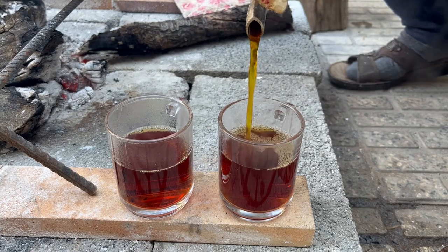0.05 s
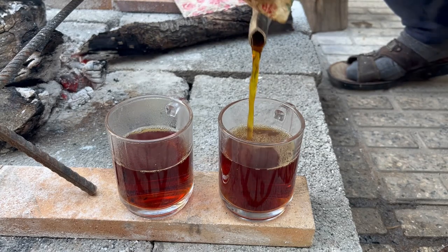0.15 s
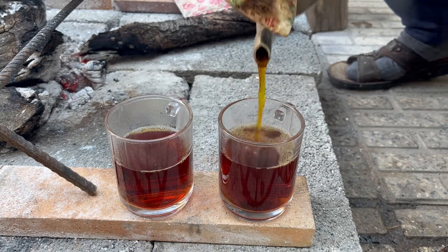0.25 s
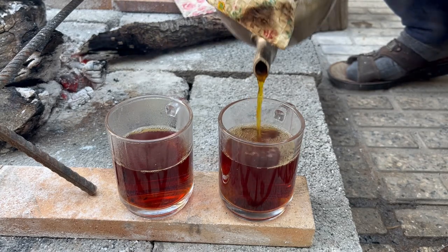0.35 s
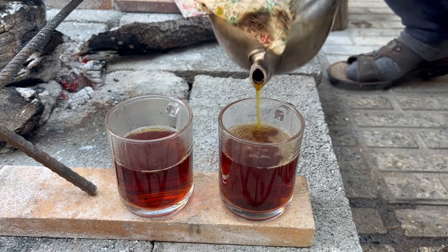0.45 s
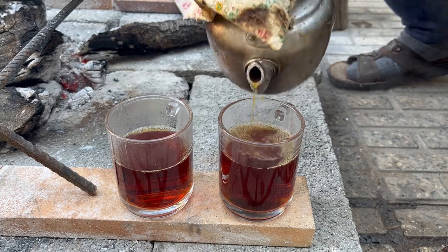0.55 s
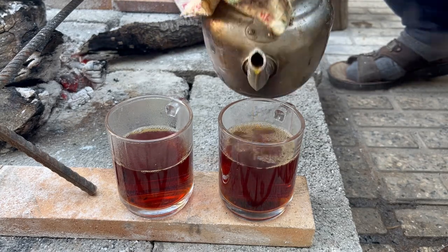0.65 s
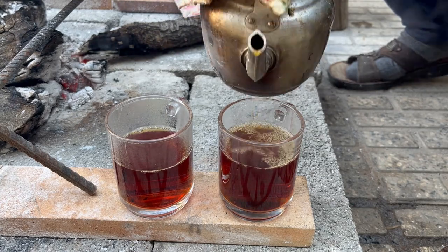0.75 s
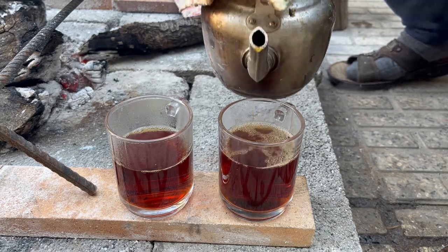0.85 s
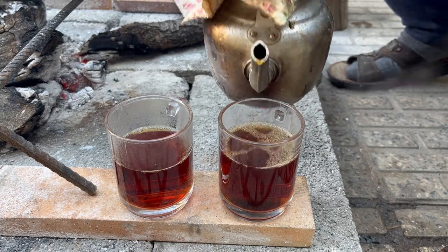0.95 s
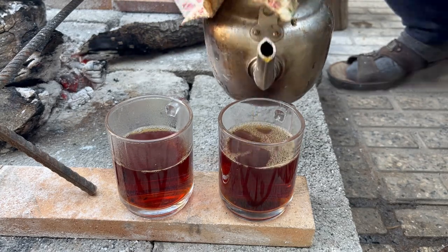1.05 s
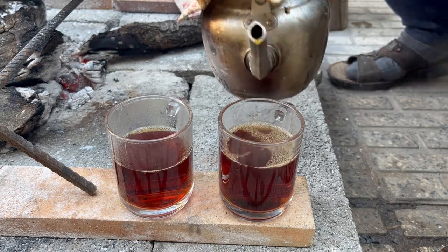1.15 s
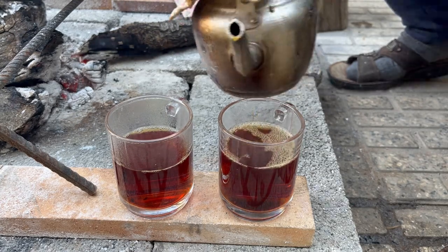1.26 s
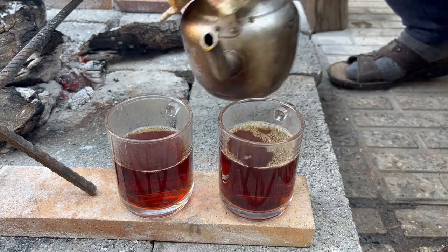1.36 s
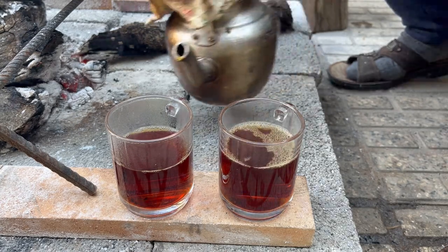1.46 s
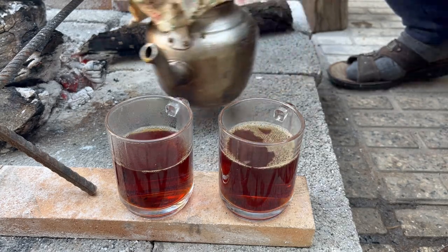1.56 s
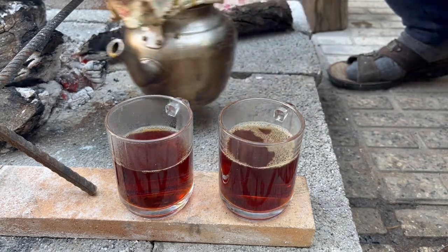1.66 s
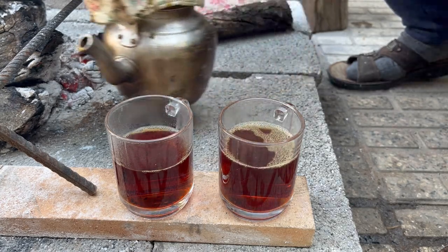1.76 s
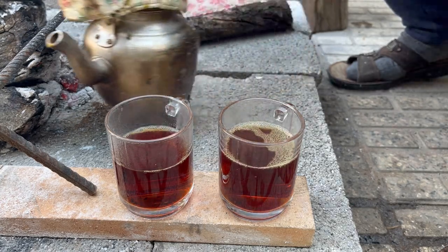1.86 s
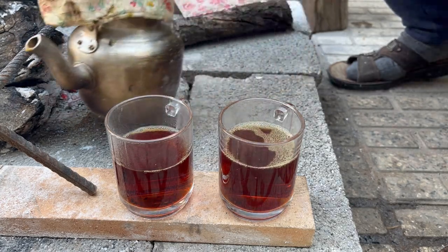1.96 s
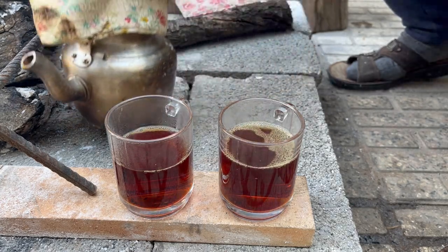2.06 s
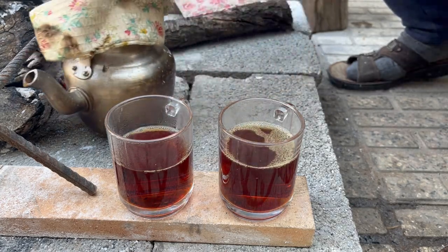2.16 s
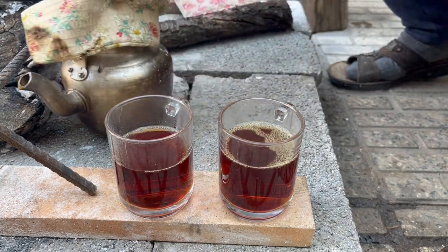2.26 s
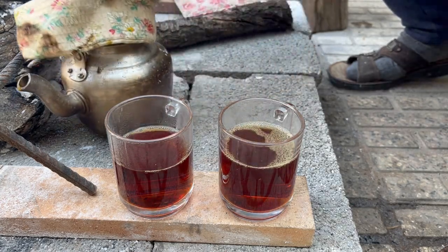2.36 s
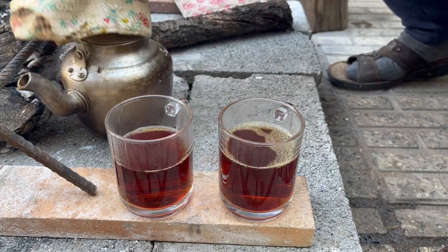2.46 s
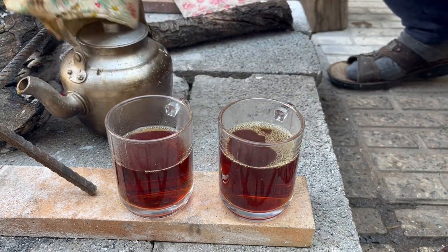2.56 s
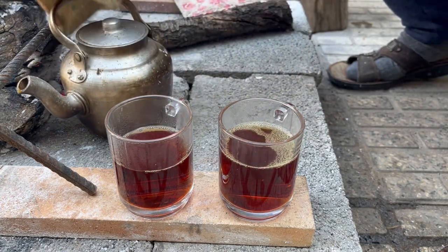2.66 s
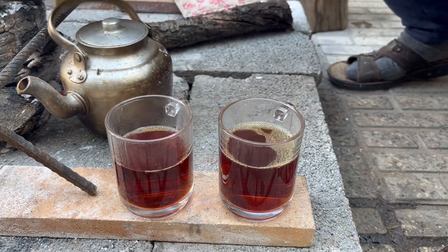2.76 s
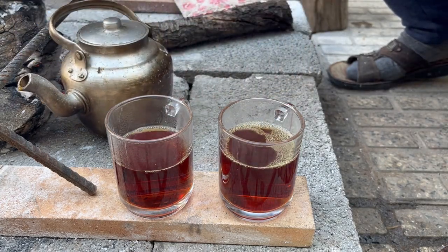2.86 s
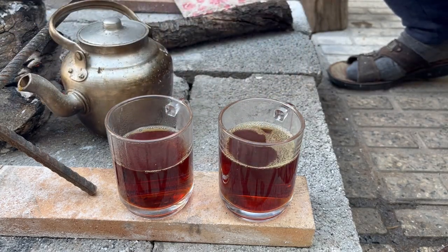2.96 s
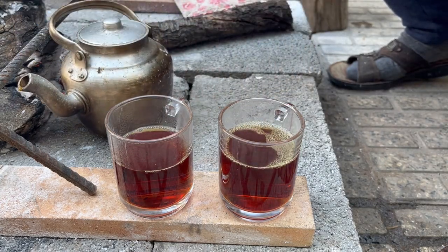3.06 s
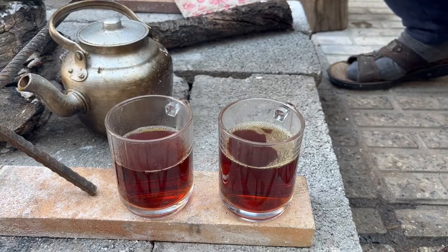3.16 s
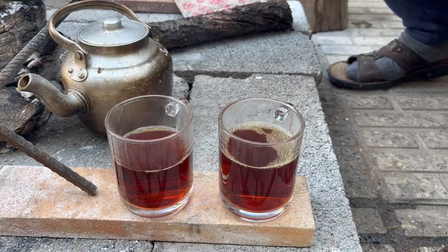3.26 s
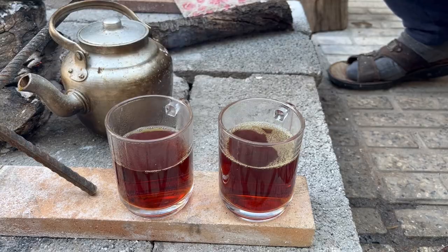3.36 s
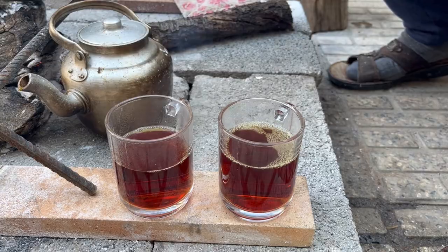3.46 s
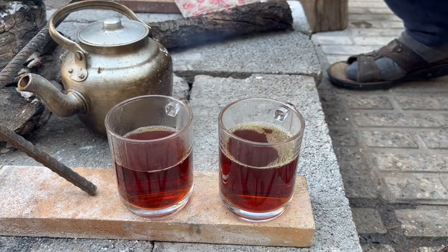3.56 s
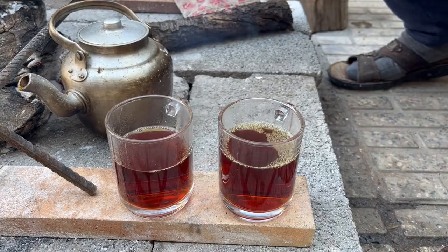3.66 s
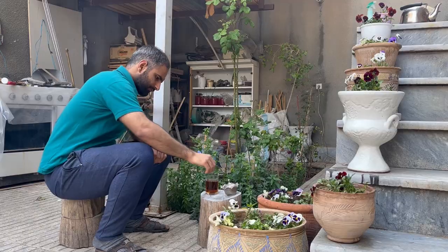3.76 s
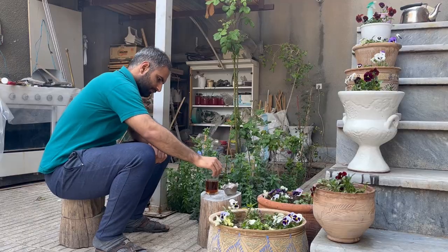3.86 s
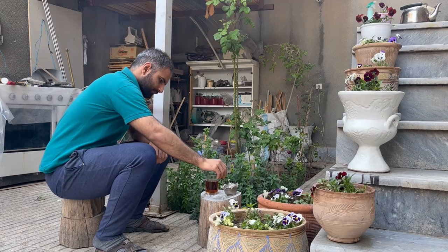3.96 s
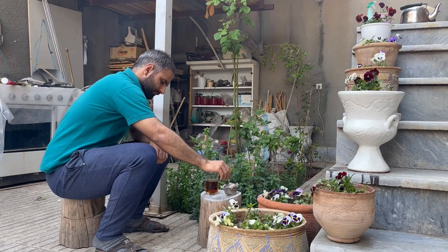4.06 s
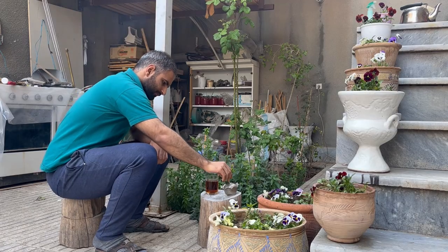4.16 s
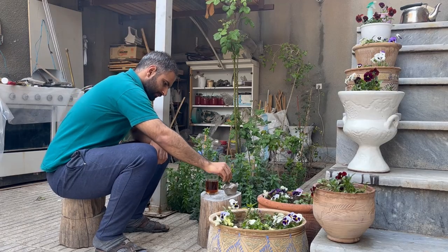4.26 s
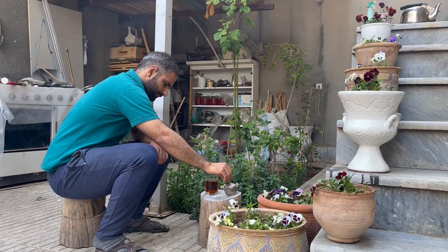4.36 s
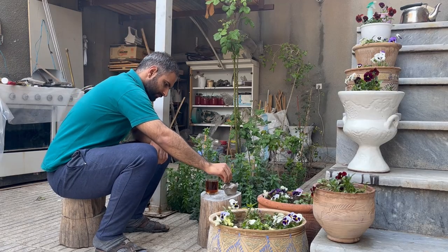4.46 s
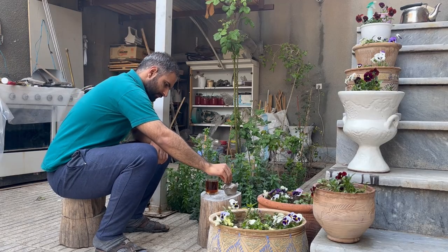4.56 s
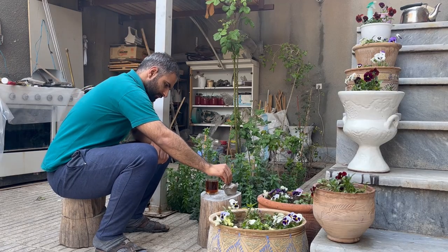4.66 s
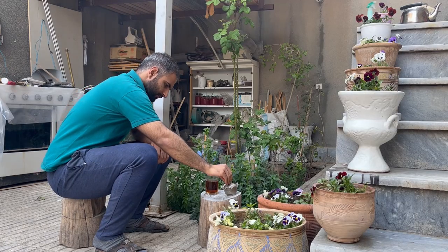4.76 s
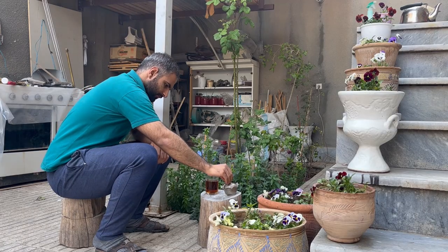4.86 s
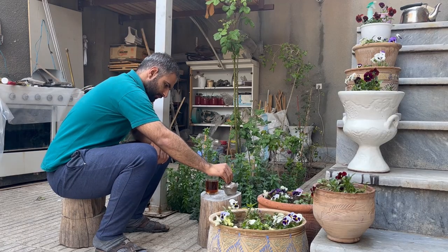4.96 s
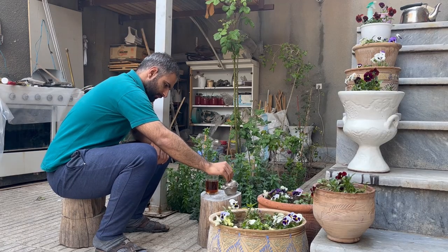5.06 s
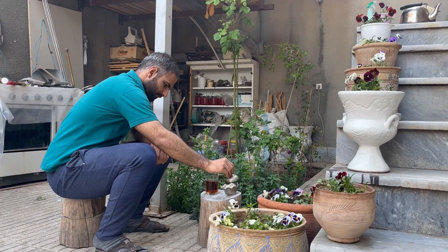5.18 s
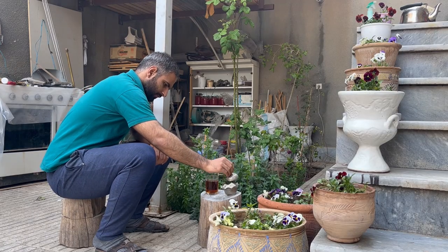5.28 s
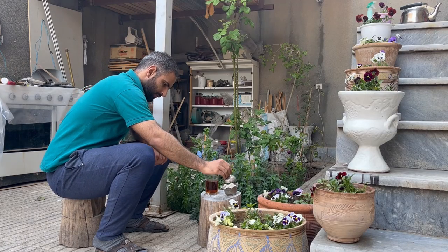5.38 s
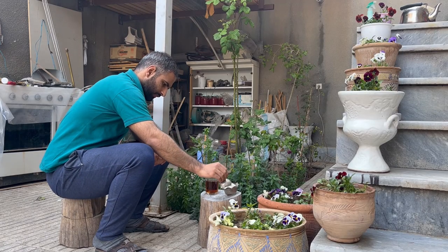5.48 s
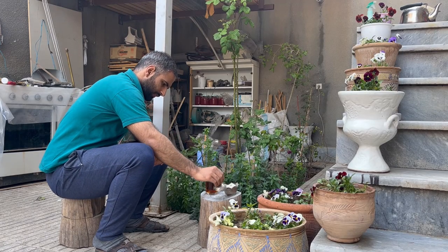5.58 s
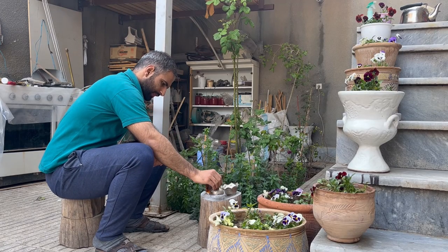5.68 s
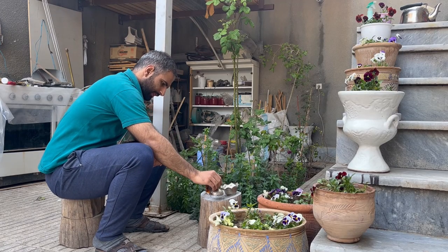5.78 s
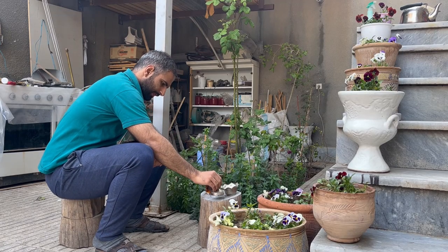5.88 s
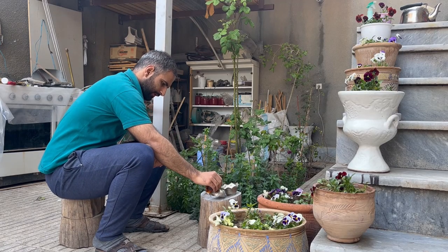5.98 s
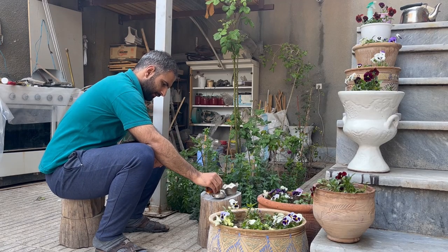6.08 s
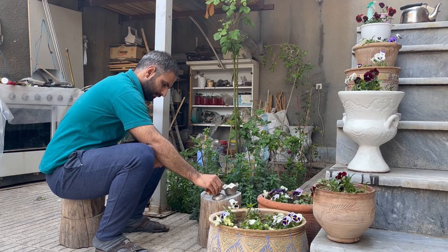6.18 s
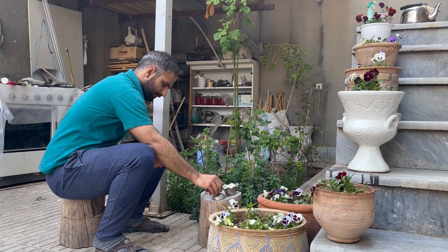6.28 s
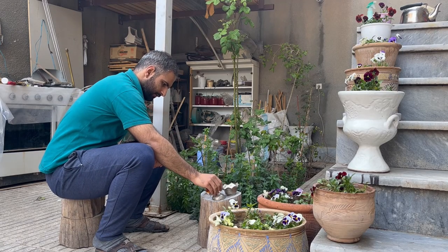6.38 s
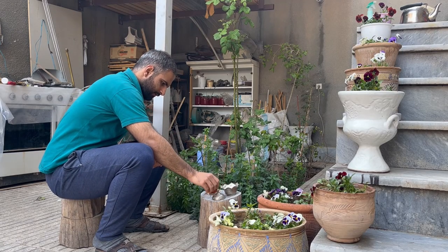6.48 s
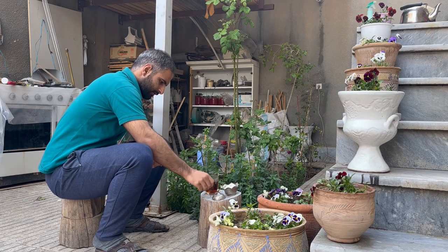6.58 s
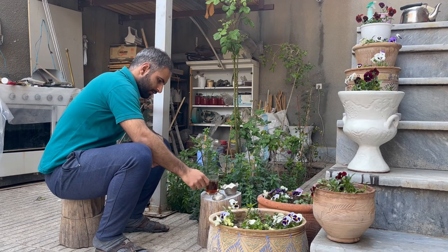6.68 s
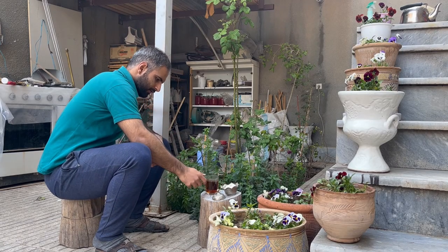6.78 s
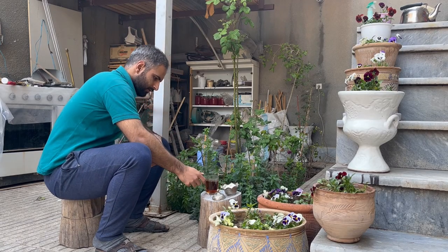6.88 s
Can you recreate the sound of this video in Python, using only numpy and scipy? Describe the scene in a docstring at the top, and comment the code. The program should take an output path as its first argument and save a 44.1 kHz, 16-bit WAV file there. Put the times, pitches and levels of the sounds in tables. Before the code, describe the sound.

Sparrows chirp in a yard as tea trickles briefly and a metal kettle is set down with a clatter, leaving quiet birdsong.

```python
"""A walled yard: the last of the tea runs into a glass, trapping bubbles that ring. Embers tick, and a metal
kettle slides, clatters down on stone and drops its handle. Sparrows and another bird chirp in quick gliding
tones that echo off the walls, over the rumble of distant traffic. Then the scene changes to a second, quieter
spot: the rumble and the embers are gone, and only the birds remain in a soft hush, with far whistles and two
rasping calls."""
import sys
import numpy as np
from scipy import signal
from scipy.fft import rfft, irfft
from scipy.io import wavfile

SR = 44100
rng = np.random.default_rng(int(sys.argv[2]) if len(sys.argv) > 2 else 0)


def materialize(psi):
    """Save the field psi as 16-bit PCM at rate SR to the path in sys.argv[1].

    A 1-D psi becomes a single channel; in a 2-D psi each row is a channel.
    """
    bounded = np.clip(np.atleast_2d(psi).T, -1, 1)
    quanta = np.round(bounded * 32767).astype(np.int16)
    wavfile.write(sys.argv[1], SR, quanta)


N = 305592


def amp(db):
    """Turn decibels into a gain."""
    return 10 ** (np.asarray(db) / 20)


def rms_one(x):
    """Scale a signal so that its average strength (rms) is 1."""
    return x / np.sqrt(np.mean(x ** 2) + 1e-20)


def at_hz(points, hz):
    """Read between rows of (Hz, value), spacing the octaves evenly."""
    row_hz, values = np.transpose(points)
    return np.interp(np.log(hz), np.log(row_hz), values)


def drift(rate_hz):
    """A smooth random wander, about 1 in size; a higher rate wanders faster."""
    step = 40
    pole = np.exp(-2 * np.pi * rate_hz * step / SR)
    slow = signal.lfilter([1], [1, -2 * pole, pole * pole], rng.standard_normal(N // step + 2002))[2000:]
    return np.interp(np.arange(N) / step, np.arange(len(slow)), rms_one(slow))


def ring(clicks, hz, ring_s):
    """Each click starts a tone that fades by 60 dB in ring_s seconds."""
    decay, angle = amp(-60 / (ring_s * SR)), 2 * np.pi * hz / SR
    return signal.lfilter([0, np.sin(angle)], [1, -2 * decay * np.cos(angle), decay ** 2], clicks + 1e-18)


def band(x, low_hz, high_hz):
    """Keep the sound between two frequencies."""
    return signal.sosfilt(signal.butter(2, [low_hz, high_hz], "band", fs=SR, output="sos"), x + 1e-18)


def low_noise(top_hz):
    """Noise that fades out above a frequency."""
    return signal.lfilter(*signal.butter(2, top_hz, fs=SR), rng.standard_normal(N))


def stereo_noise(spectrum):
    """Noise shaped by rows of (Hz, dB), most alike on both sides in the bass."""
    # How alike left and right are. Each row: frequency in Hz, likeness (1 means the same).
    likeness = [(60, 0.95), (180, 0.89), (550, 0.38), (1650, 0.62), (4970, 0.51), (15000, 0.66)]
    hz = np.fft.rfftfreq(N, 1 / SR) + 1
    mid, side = rfft(rng.standard_normal((2, N))) * amp(at_hz(spectrum, hz))
    alike = at_hz(likeness, hz)
    return rms_one(irfft(np.sqrt(1 + alike) * mid + np.sqrt(1 - alike) * side * [[1], [-1]], N))


def echoes(x, fade_s, build_s):
    """A wash of yard echoes, different on each side, that builds up and fades by 60 dB."""
    t = np.arange(int(fade_s * SR)) / SR
    tail = rng.standard_normal((2, len(t))) * amp(-60 * t / fade_s) * np.clip(t / build_s, 0, 1)
    return signal.fftconvolve(x[None], tail / np.sqrt(np.sum(tail ** 2) / 2), axes=1)[:, :N]


def pan(x, left_db):
    """Make the left side louder than the right by left_db."""
    return x * amp([[left_db / 2], [-left_db / 2]])


def swells(rows, rise_db_per_s, fall_db_per_s):
    """The level in dB over time of sounds that rise, hold and fall."""
    t = np.arange(N) / SR
    return np.max([db - rise_db_per_s * np.maximum(s - t, 0) - fall_db_per_s * np.maximum(t - s - hold, 0)
                   for s, hold, db, *_ in rows], axis=0)


def sing(notes, hoarse, grit_db, skew):
    """Tones glide through three pitches, roughened by noise; a skew below 1 makes them peak early."""
    tones, loudness = np.zeros((2, N))
    waver = 1 + 0.013 * drift(150)
    for s, length, first, middle, last, db in notes:
        u = np.linspace(0, 1, int(length * SR))   # progress through the note
        here = slice(int(s * SR), int(s * SR) + len(u))
        hz = first * (1 - u) * (1 - 2 * u) + 4 * middle * u * (1 - u) + last * u * (2 * u - 1)
        phase = 2 * np.pi * np.cumsum(hz * waver[here]) / SR
        shape = np.sqrt(np.sin(np.pi * u ** skew).clip(0)) * amp(db)
        tones[here] += shape * (np.sin(phase) + amp(-24.5) * np.sin(2 * phase))
        loudness[here] += shape
    smear = rms_one(low_noise(380))
    grit = rms_one(band(rng.standard_normal(N), 5500, 9000))
    return tones * (1 + hoarse * smear) + amp(grit_db) * loudness * grit


def near_air():
    """The deep, gently wavering background noise at the first spot."""
    # Its tone colour. Each row: frequency in Hz, relative level in dB.
    spectrum = [(15, -31), (25, -9), (64, -7.5), (129, -2), (227, -22.5), (297, -18.5), (582, -29.5),
                (970, -32.5), (1530, -44), (2300, -49), (3340, -45), (6050, -49), (8580, -61.5),
                (12800, -50), (15500, -69.5)]
    return amp(-53 + 0.27 * drift(2.54)) * stereo_noise(spectrum)


def traffic(lump_db, octave_db):
    """Distant traffic: a low drone with two overtones, and a lumpy rumble that partly follows its level."""
    # A low traffic drone near 61 Hz that wavers at random and swells once.
    # Each row: time in seconds, level in dB, frequency in Hz.
    drone_path = [(0.0, -57, 59.5), (0.27, -52.5, 57.2), (0.4, -57.5, 62.36), (0.73, -53.5, 58.7),
                  (0.79, -61.5, 65.6), (0.86, -51.5, 62.9), (1.33, -54.5, 62.6), (1.51, -54, 57.06),
                  (1.63, -58.5, 60.86), (2.28, -42.5, 61), (2.53, -53.5, 61.3), (2.8, -59.5, 55.2),
                  (2.93, -49.5, 62.2), (3.13, -60.5, 63.5), (3.71, -48.5, 64.0), (3.75, -52, 63.9)]
    times, levels, frequencies = np.transpose(drone_path)
    t = np.arange(N) / SR
    db, hz = np.interp(t, times, levels), np.interp(t, times, frequencies)
    phase = 2 * np.pi * np.cumsum(hz * (1 + 0.028 * drift(3.84))) / SR
    wave = np.sin(phase) + amp(octave_db) * np.sin(2 * phase) + amp(-24.5) * np.sin(5 * phase)
    drone = np.sqrt(2) * amp(db + 1.8 * drift(2.5)) * wave
    rumble_db = -61 + .4 * (db - levels.mean()) + lump_db * drift(5.4)
    return drone + amp(rumble_db) * rms_one(band(rng.standard_normal(N), 40, 164))


def tea(cycles, rise, fizz_db):
    """Trapped bubbles ring briefly, rising in pitch; faint ones fizz at random while the stream runs."""
    # The louder bubbles and last drips. Each row: start in seconds, level in dB, pitch in Hz.
    bubbles = [(0.0122, -55, 2050), (0.042, -60, 2020), (0.0635, -50, 1980), (0.1061, -50, 1930),
               (0.1106, -42.5, 1844), (0.1227, -51, 1820), (0.1406, -52, 2010), (0.2385, -51.5, 1880),
               (0.2451, -47, 1860), (0.301, -55, 1970), (0.3232, -57, 1940), (0.5416, -61.5, 1950),
               (0.5555, -56, 1900)]
    out = np.zeros(N)
    for s, db, hz in bubbles:
        t = np.arange(int(2 * cycles / hz * SR)) / SR
        age = t * hz / cycles   # 1 when the bubble has faded by 60 dB
        phase = 2 * np.pi * np.cumsum(hz * (1 + rise * (age - .3))) / SR
        out[int(s * SR):int(s * SR) + len(t)] += amp(db - 60 * age) * np.sin(phase)
    stream = np.interp(np.arange(N) / SR, [0, .36, .5], [1, .7, 0])
    births = (rng.random(N) < 250 / SR) * amp(2.6 * rng.exponential(1, N) + fizz_db) * stream
    fizz_hz, choice = np.geomspace(1600, 2400, 6), rng.integers(0, 6, N)
    return out + sum(ring(births * (choice == k), hz, 14 / hz) for k, hz in enumerate(fizz_hz))


def chipping_bird(fall_hz_per_s):
    """A bird's short, hoarse chips drop in pitch, faster towards the end."""
    # The chips. Each row: start in seconds, length in seconds, first pitch in Hz, level in dB.
    chips = [(0.012, 0.023, 6520, -73.5), (0.562, 0.017, 7270, -68.5), (0.638, 0.028, 6670, -67.5),
             (0.772, 0.02, 5500, -68), (0.926, 0.016, 7180, -65.5), (1.073, 0.021, 6330, -68.5),
             (1.278, 0.023, 7000, -66.5), (1.363, 0.028, 6704, -71.5), (1.53, .01, 5320, -69),
             (1.706, 0.019, 7220, -67), (1.844, 0.023, 6040, -66.5)]
    notes = [(s, length, hz, hz - .4 * fall_hz_per_s * length, hz - fall_hz_per_s * length, db)
             for s, length, hz, db in chips]
    return sing(notes, hoarse=1.0, grit_db=-46, skew=0.45)


def embers(ticks_per_s, small_db):
    """Cracking charcoal makes tiny bright ticks, with fainter ones at random in between."""
    # The louder cracks. Each row: time in seconds, level in dB, dB added for the lower part.
    cracks = [(0.11, -65, -14), (0.406, -64, -1), (0.507, -58, -46), (0.554, -61, -11), (0.59, -60, -9.5),
              (0.943, -65, -12), (1.3706, -66, 3), (1.6093, -62, -33), (1.6158, -63, -11),
              (1.659, -63, -16), (3.1706, -69, -19), (3.192, -62, -5), (3.217, -61, -15), (3.2572, -64, -6),
              (3.4433, -69, -2)]
    high, low = np.zeros((2, N))
    for s, db, lower_db in cracks:
        high[int(s * SR)], low[int(s * SR)] = amp([db, db + lower_db])
    high += (rng.random(N) < ticks_per_s / SR) * amp(small_db + 3 * np.minimum(rng.exponential(1, N), 3))
    ticks = 7 * band(high, 11000, 17000) + 14 * band(low, 4800, 7000)
    return ticks + amp(1.5) * echoes(ticks, .06, 0.0011)


def sparrows():
    """Sparrows build their chirps from four shapes of gliding whistle."""
    # Thin notes that sag. Each row: start in seconds, length in seconds, first pitch in Hz, level in dB.
    thin_notes = [(0.151, 0.091, 6910, -69), (0.25, 0.078, 6460, -68.5), (.73, 0.039, 5800, -74),
                  (0.878, 0.011, 5600, -74), (1.004, 0.026, 5600, -72), (1.207, .05, 5830, -71),
                  (1.458, 0.011, 4960, -68.5), (1.785, .02, 5500, -73), (3.837, 0.06, 6740, -73),
                  (5.497, .04, 6300, -75.5)]
    # A flick up, then a held note. Each row: start in seconds, level in dB, hold in seconds.
    hooks = [(0.198, -61.5, 0.055), (2.84, -64, 0.042), (3.865, -63.5, .057), (4.087, -79, 0.08)]
    # Up, down, up, down. Each row: time of the first top, rise time, drop time and wait for the second
    # top, all in seconds, then the two top pitches in Hz and their two levels in dB.
    zigzags = [(0.297, 0.025, 0.035, 0.058, 4985, 4350, -56, -64.5),
               (1.252, .015, 0.049, .075, 4840, 4000, -61.5, -66.5),
               (2.962, .04, 0.036, 0.038, 5199, 4470, -58.5, -60),
               (3.961, 0.028, 0.03, .061, 4900, 4650, -59, -61.5),
               (5.541, .022, .028, .091, 5375, 4590, -58.5, -59)]
    # An arch, then a low note. Each row: start in seconds, level in dB, wait for the low note in
    # seconds, its level in dB.
    arches = [(.785, -66.5, 0.044, -63), (3.325, -75.5, 0.052, -78), (4.165, -72, 0.048, -65.5),
              (4.43, -72.5, 0.055, -67.5), (5.648, -69.5, 0.042, -76), (6.235, -69.5, 0.048, -75.5)]
    sag_hz_per_s, start_hz, trough_hz = 10000, 3400, 2950
    notes = [(s, length, hz, hz - sag_hz_per_s * length / 2, hz - sag_hz_per_s * length, db)
             for s, length, hz, db in thin_notes]
    for s, db, hold in hooks:
        notes += [(s, .015, 3670, 4460, 5030, db), (s + .015, hold, 4200, 4140, 4140, db)]
    for s, rise, drop, wait, first_hz, second_hz, first_db, second_db in zigzags:
        first = (s, rise, drop, start_hz, first_hz, first_db, .66)
        second = (s + wait, .035, .029, trough_hz, second_hz, second_db, .32)
        for top_s, up_s, down_s, low_hz, hz, db, halfway_share in (first, second):
            climb = (top_s - up_s, up_s, low_hz, low_hz + halfway_share * (hz - low_hz), hz, db)
            crest = (top_s - .01, .02, hz - 250, hz, hz - 250, db + 1)   # the voice lingers on top
            fall = (top_s, down_s, hz, trough_hz + .4 * (hz - trough_hz), trough_hz, db - 3)
            notes += [climb, crest, fall]
    for s, db, wait, low_db in arches:
        notes += [(s, .031, 3150, 4680, 3200, db), (s + wait, .035, 3053, 3440, 3150, low_db)]
    return sing(notes, hoarse=.45, grit_db=-24, skew=1.09)


def kettle_slide(grain_db):
    """The kettle and its cloth slide about with a grainy rubbing noise."""
    # The tone colour of the rubbing. Each row: frequency in Hz, relative level in dB.
    spectrum = [(880, -45.5), (1500, -7), (2440, -9.5), (3210, -13.5), (4310, -3), (6750, -8), (8540, -38),
                (8970, -18.5), (11400, -11), (14800, -21.5), (15500, -30)]
    # The slides. Each row: start in seconds, hold in seconds, level in dB.
    slides = [(1.86, .15, -69), (2.155, 0.011, -68.5), (2.25, 0.13, -68), (2.545, 0.021, -60),
              (2.76, 0.18, -66.5)]
    db = swells(slides, rise_db_per_s=151.5, fall_db_per_s=111)
    return stereo_noise(spectrum) * amp(db + grain_db * drift(40))


def kettle_knocks(shell_db, clatter_db, thud_db, spread_db):
    """Each knock is a brief chatter that clatters, rings the metal shell and thuds the base on stone."""
    # Kettle, lid and handle knocks. Each row: time in seconds, level in dB, added treble in dB,
    # added thud in dB.
    knocks = [(2.018, -40, -20, -16), (2.053, -60.5, 9.5, -12), (2.1191, -38, 6, 0.5),
              (2.1229, -33, 18.5, 5.5), (2.132, -29.5, -6, -8.5), (2.184, -30.5, -19, -12.5),
              (2.204, -47, 4, -7.5), (2.255, -53.5, 9.5, 3.5), (2.3513, -40, 11, -37), (2.452, -56, 6, -21),
              (2.482, -35, 10, -19), (2.488, -42, 4.5, -23), (2.5, -35, 0.5, -11), (2.548, -55, -17, 12),
              (2.566, -44.5, -2.5, 1), (2.586, -39, 0, -6.5), (2.611, -42.5, -4, -18),
              (2.645, -43, 12, -22), (2.77, -25.5, 12, -25.5), (2.775, -26, 6, -20),
              (2.792, -32, -1.5, -9.5), (2.804, -38, -5.5, 2), (2.854, -51.5, -22, 7)]
    # The shell's tones. Each row: pitch in Hz, level in dB, ring time in seconds before damping.
    shell_tones = [(982, -9.5, 0.13), (1720, -19.5, 0.099), (2654, -10, 0.046), (2997, -17.5, 0.04),
                   (3800, -21.5, 0.17), (4000, -9.5, 0.097), (4620, -3, 0.31), (5200, 0, 0.045),
                   (5280, -10.5, 0.22), (5760, 2.5, 0.043), (6454, 6.5, 0.027), (9030, -24, 0.54),
                   (11200, -10, 0.033), (12230, -17.5, 0.14), (11000, -23.5, 0.11), (13300, -12, 0.042),
                   (13000, -13, 0.037), (11900, -0.5, 0.052), (13980, -7.5, 0.0797), (13860, -24.5, 0.12)]
    # The tones of the base on stone, with the same columns.
    base_tones = [(184, -3, 0.098), (438.5, 3.5, 0.05), (490.5, 1.5, 0.15), (644, -4.5, 0.039),
                  (1019.5, -4, 0.049)]
    # The tone colour of the dry clatter. Each row: frequency in Hz, relative level in dB.
    clatter_spectrum = [(410, -32.5), (700, 1), (1290, -12), (1970, -9), (2160, -22), (2460, -10),
                        (2840, -12), (6420, -21), (8880, -49.5), (9350, -5.5), (12100, -13.5),
                        (14000, -14.5), (15500, -32)]
    size, lead = int(.3 * SR), 128
    t, hz = (np.arange(size) - lead) / SR, np.fft.rfftfreq(size, 1 / SR) + 1
    fade_out = np.clip((t[-1] - t) / 0.033, 0, 1)
    out = np.zeros(N)
    for s, db, treble_db, low_db in knocks:
        chatter_s = 0.0063 * amp(.15 * low_db)   # heavy thuds chatter longer
        fade = np.exp(-t / chatter_s) + 0.068 * np.exp(-t / .03)
        burst = rng.standard_normal(size) * fade * np.clip(t / .001, 0, 1)
        chance_db = spread_db * rng.standard_normal(len(shell_tones) + len(base_tones))
        shell, base = np.zeros((2, size))
        for (pitch, tone_db, ring_s), extra_db in zip(shell_tones, chance_db):
            damped_s = min(ring_s, .03, 110 / pitch)   # hand and stone damp the shell
            detuned = pitch * (1 + .02 * rng.standard_normal())
            shell += amp(tone_db + extra_db) * ring(burst, detuned, damped_s)
        for (pitch, tone_db, ring_s), extra_db in zip(base_tones, chance_db[::-1]):
            detuned = pitch * (1 + .02 * rng.standard_normal())
            base += amp(tone_db + extra_db / 2) * ring(burst, detuned, min(ring_s, .11))
        shell *= amp(shell_db + min(treble_db, 0))   # dull knocks ring less
        clatter = rfft(burst) * amp(at_hz(clatter_spectrum, hz) + clatter_db)
        bright = irfft((rfft(shell) + clatter) * amp(treble_db * (hz > 8300)), size)
        start = int(s * SR) - lead
        out[start:start + size] += amp(db) * (bright + amp(low_db + thud_db) * base) * fade_out
    return out


def place_kettle(x, lag_s, lag_from_hz):
    """The close kettle reaches the two sides at different levels, its treble later on the left."""
    # The balance. Each row: frequency in Hz, left level over right in dB.
    balance = [(60, -2), (150, -0.5), (380, 2.5), (950, 6), (2380, 5), (5980, 6.5), (15000, 0.5)]
    hz = np.fft.rfftfreq(N, 1 / SR) + 1
    half_lag = np.exp(-1j * np.pi * lag_s * np.maximum(hz - lag_from_hz, 0))
    left = amp(at_hz(balance, hz) / 2) * half_lag
    return irfft(rfft(x) * np.array([left, 1 / left]), N)


def rising_hiss():
    """A faint, narrow hiss climbs in pitch."""
    # The one row: start and length in seconds, first, middle and last pitch in Hz, level in dB.
    glide = [(3.42, .3, 1300, 1578, 2102, -82.5)]
    return sing(glide, hoarse=2.1, grit_db=-60, skew=0.67)


def far_air():
    """The much softer background noise at the second spot."""
    # Its tone colour. Each row: frequency in Hz, relative level in dB.
    spectrum = [(15, -44), (25, -5), (77, 2.5), (169, -8.5), (231, -8), (534, -17), (833, -17.5),
                (1730, -28), (3700, -28), (5340, -35.5), (9250, -45.5), (10300, -50), (13000, -56)]
    return amp(-68 + 1.3 * drift(0.73)) * pan(stereo_noise(spectrum), 1.2)


def whistling_bird():
    """A far bird whistles a run of short gliding notes."""
    # The song. Each row: start and length in seconds, first, middle and last pitch in Hz, level in dB.
    song = [(4.27, 0.056, 3420, 3480, 3260, -80), (4.375, .06, 3330, 2895, 3150, -80),
            (4.55, 0.019, 3430, 3450, 3530, -74.5), (4.61, 0.0424, 3750, 3424, 2600, -73),
            (4.67, 0.054, 2370, 3040, 3300, -75), (4.8, 0.045, 2180, 2240, 2280, -80),
            (4.86, 0.075, 2440, 2520, 2990, -77.5), (4.95, 0.12, 3624, 3815, 4000, -76.5),
            (5.045, 0.092, 4070, 4030, 3950, -85), (5.18, 0.024, 4200, 4000, 3026, -75.5),
            (5.21, 0.022, 2730, 2785, 2280, -75.5), (5.25, .02, 2070, 2420, 2650, -79),
            (5.34, 0.033, 2350, 2290, 2244, -79), (5.41, 0.017, 2270, 2290, 2250, -81.5),
            (5.45, .07, 2420, 3470, 3670, -78), (5.52, 0.022, 3450, 3020, 2460, -75.5)]
    return sing(song, hoarse=0.32, grit_db=-41, skew=0.87)


def rasping_bird(pulse_hz, rough):
    """A bird rasps: two bands of noise arch in pitch, chopped by fast, uneven pulses."""
    # The calls. Each row: start in seconds, hold in seconds, level in dB, top of the upper band in Hz.
    calls = [(6.45, .2, -73.5, 5880), (6.82, 0.24, -73.5, 5830)]
    top_s, lower_hz = .08, 3450   # both bands are highest top_s into the call
    t = np.arange(N) / SR
    db = swells(calls, rise_db_per_s=701, fall_db_per_s=231.5)
    nearest = np.argmin([abs(t - s - hold / 2) for s, hold, *_ in calls], axis=0)
    start, _, _, upper_hz = np.array(calls)[nearest].T
    droop_hz = 36000 * np.clip(t - start - top_s, -.15, .15) ** 2
    chop = 1 + rough * np.sin(2 * np.pi * np.cumsum(pulse_hz * (1 + 0.17 * drift(24))) / SR)
    phase = 2 * np.pi * np.cumsum(upper_hz - droop_hz) / SR
    upper = low_noise(260) * np.cos(phase) + low_noise(260) * np.sin(phase)
    upper *= 1 + 0.75 * np.cos(0.17 * phase)   # adds a weaker band just above and just below
    lower = low_noise(170) * np.sin(2 * np.pi * np.cumsum(lower_hz - droop_hz) / SR)
    late_swell = np.clip((t - start) / top_s, .2, 1)
    return chop * amp(db) * (rms_one(upper) + amp(-9) * rms_one(lower) * late_swell)


def scene():
    """Beside the kettle first, then the scene changes to a spot farther back; the birds sing throughout."""
    change_s = 3.752
    near = np.clip((change_s * SR - np.arange(N)) / 40, 0, 1)   # 1 before the scene changes, 0 after
    birds = pan(sparrows(), -1.3) + pan(chipping_bird(fall_hz_per_s=130000), 1.5)
    birds += pan(whistling_bird(), -1.8) + pan(rasping_bird(pulse_hz=132, rough=0.223), 3.3)
    early_echoes = amp(2.5) * echoes(birds.mean(0), fade_s=.2, build_s=0.016)   # these blur each note
    late_echoes = amp(-3) * echoes(birds.mean(0), fade_s=0.65, build_s=0.048)
    metal = kettle_knocks(shell_db=-29.5, clatter_db=2, thud_db=-29.5, spread_db=5)
    close = place_kettle(metal, lag_s=.000135, lag_from_hz=5000)
    close += amp(-5) * echoes(metal, 0.043, 0.0017) + amp(-11) * echoes(metal, 0.22, 0.0033)
    pour = tea(cycles=20, rise=0.033, fizz_db=-69)
    close += kettle_slide(grain_db=1.5)
    close += pour + amp(-4.5) * echoes(pour, 0.074, 0.0013)
    close += embers(ticks_per_s=16, small_db=-74) + rising_hiss()
    background = near_air() + traffic(lump_db=4, octave_db=-12.5)
    return birds + early_echoes + late_echoes + near * (close + background) + (1 - near) * far_air()


def record(dry):
    """Cut away the very highest treble."""
    cutoff_hz = 15800
    return signal.sosfilt(signal.cheby2(16, 50, cutoff_hz, fs=SR, output="sos"), dry)


dry = scene()
out = record(dry)
materialize(out)
```